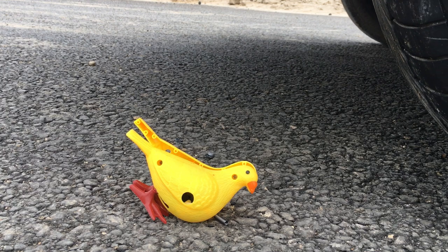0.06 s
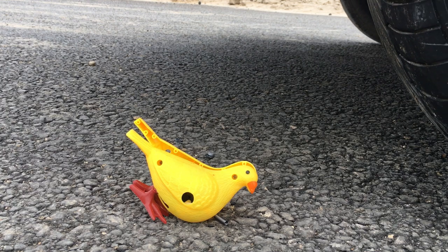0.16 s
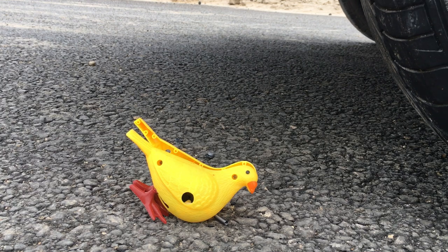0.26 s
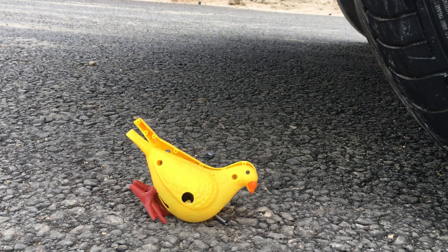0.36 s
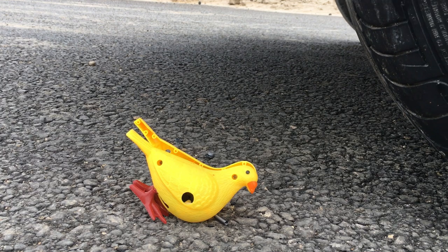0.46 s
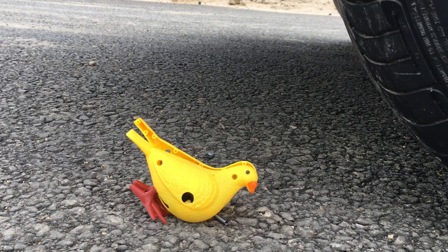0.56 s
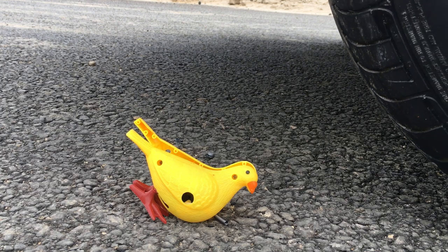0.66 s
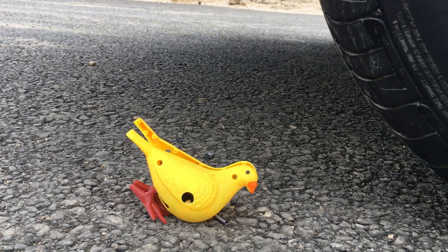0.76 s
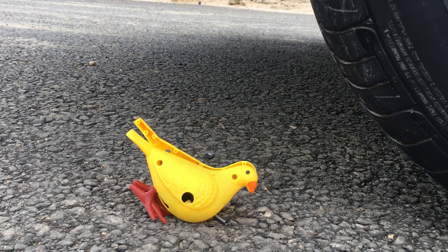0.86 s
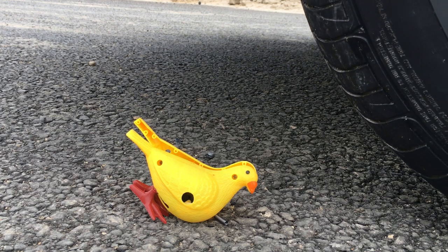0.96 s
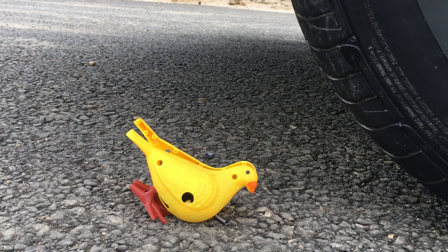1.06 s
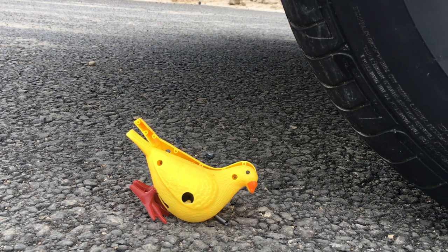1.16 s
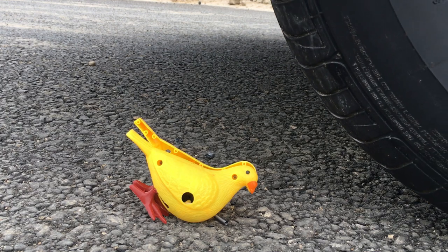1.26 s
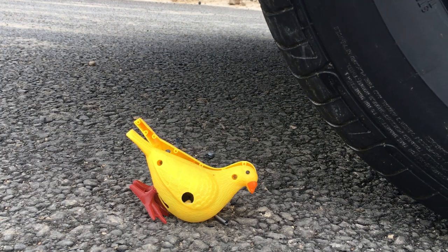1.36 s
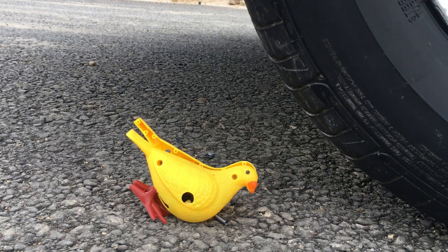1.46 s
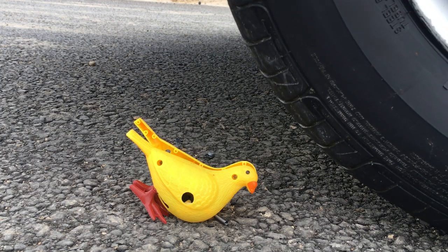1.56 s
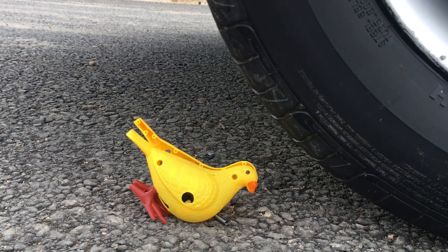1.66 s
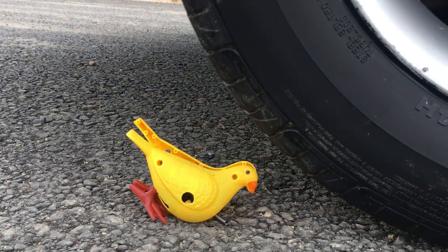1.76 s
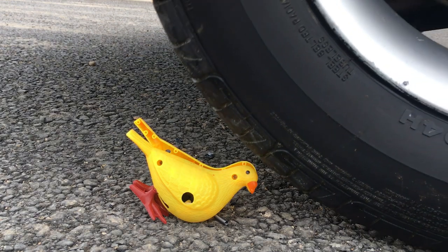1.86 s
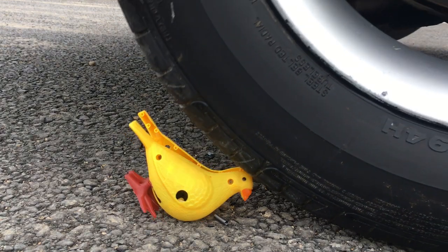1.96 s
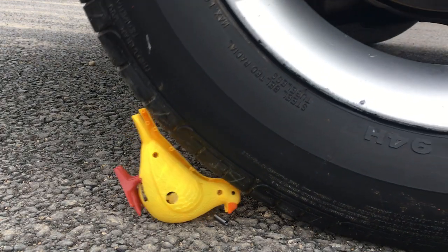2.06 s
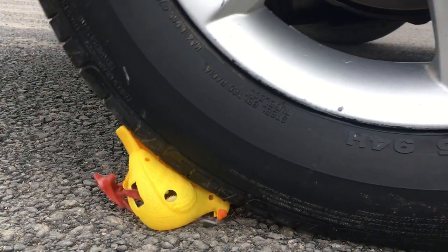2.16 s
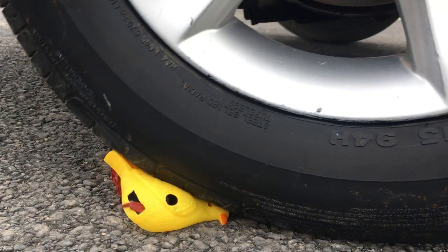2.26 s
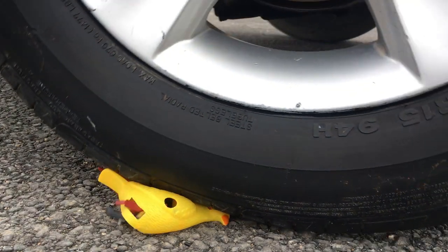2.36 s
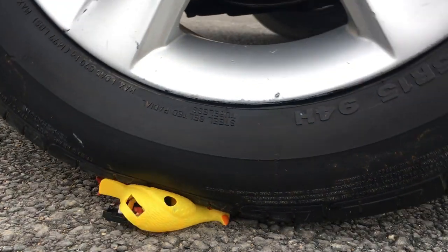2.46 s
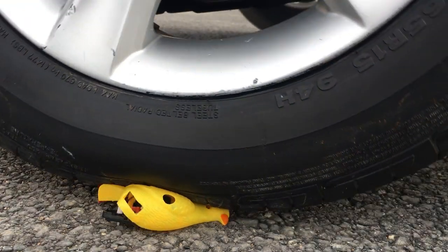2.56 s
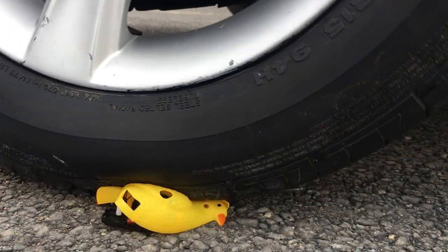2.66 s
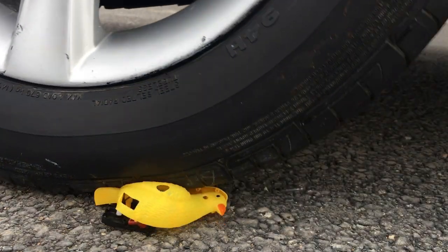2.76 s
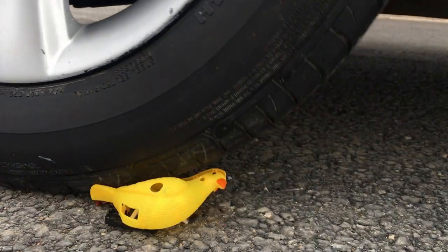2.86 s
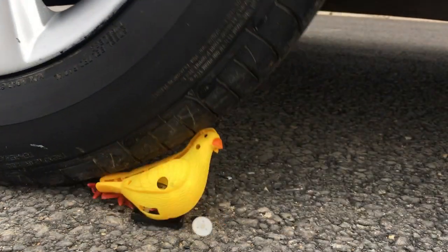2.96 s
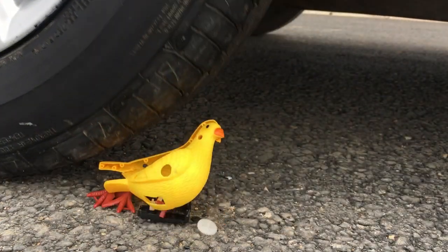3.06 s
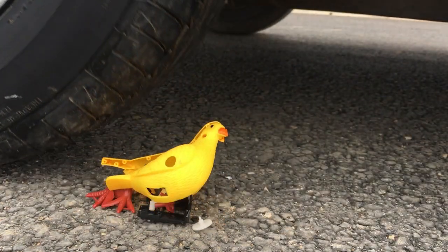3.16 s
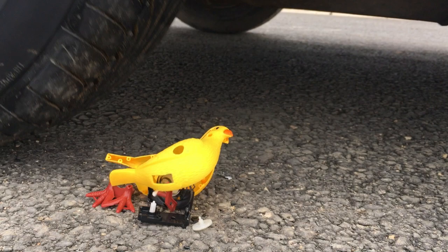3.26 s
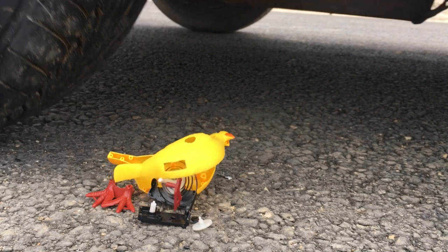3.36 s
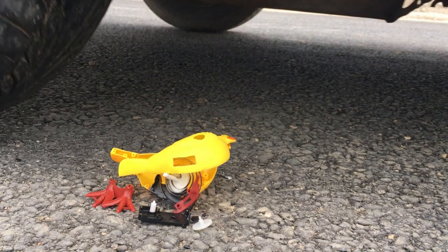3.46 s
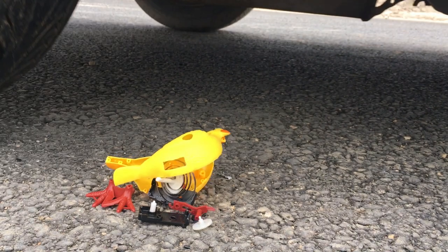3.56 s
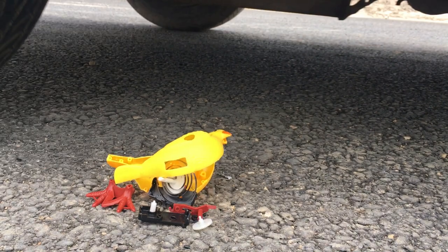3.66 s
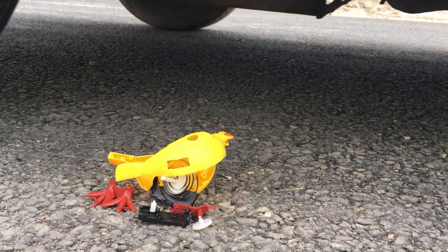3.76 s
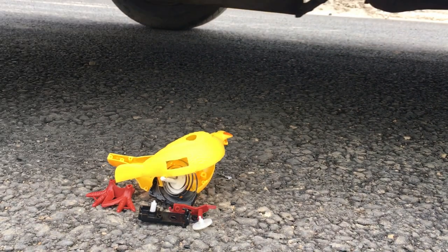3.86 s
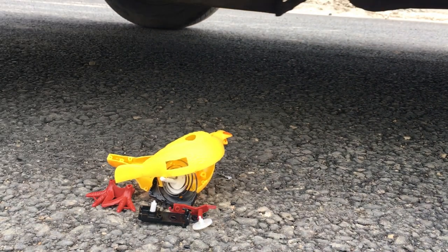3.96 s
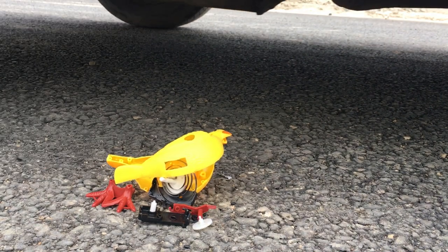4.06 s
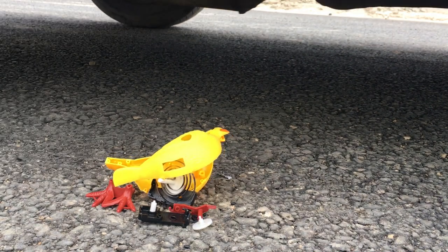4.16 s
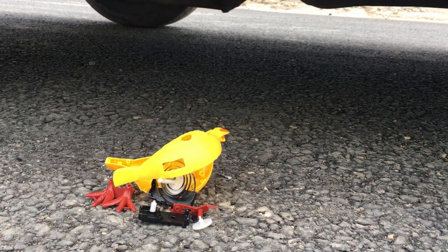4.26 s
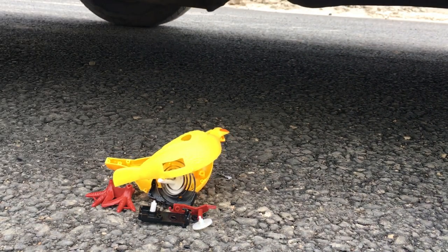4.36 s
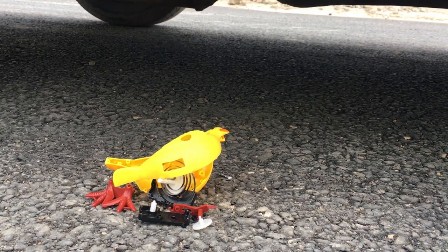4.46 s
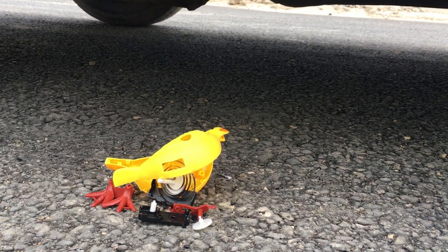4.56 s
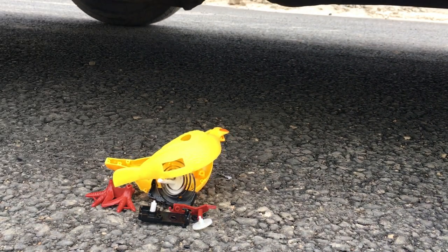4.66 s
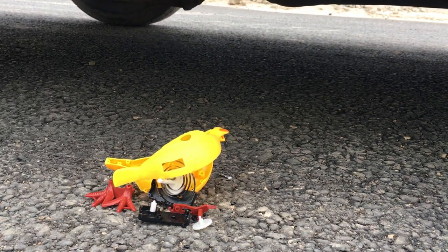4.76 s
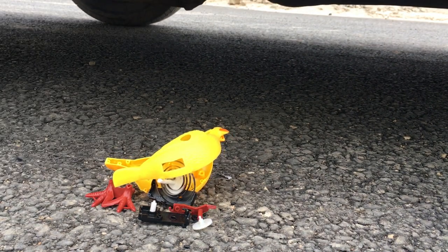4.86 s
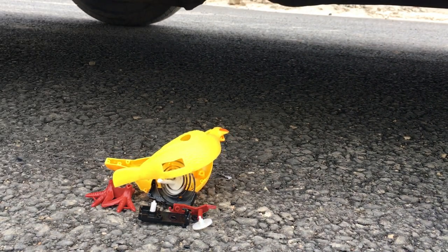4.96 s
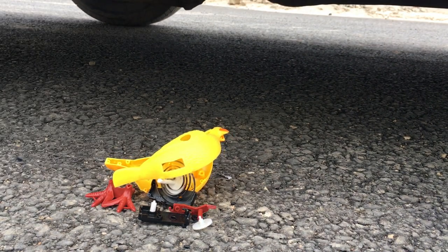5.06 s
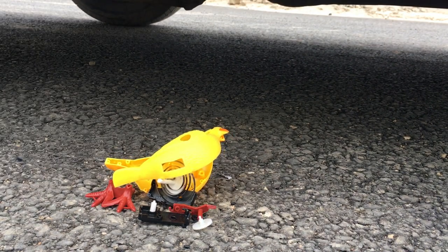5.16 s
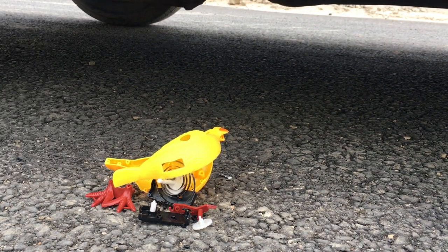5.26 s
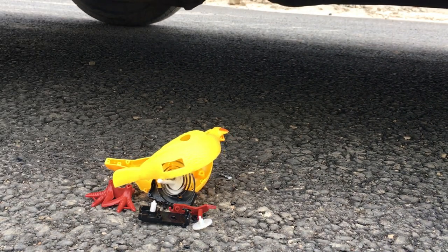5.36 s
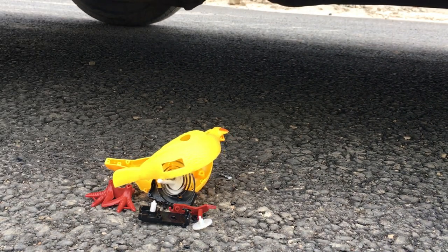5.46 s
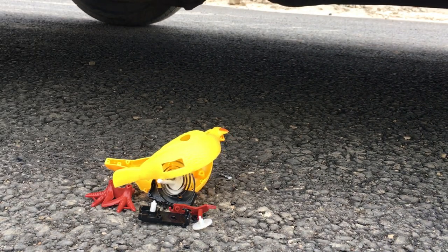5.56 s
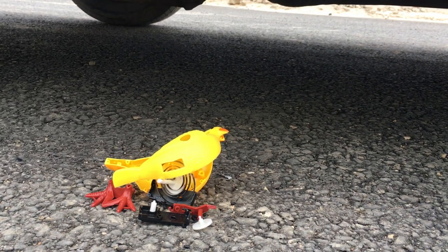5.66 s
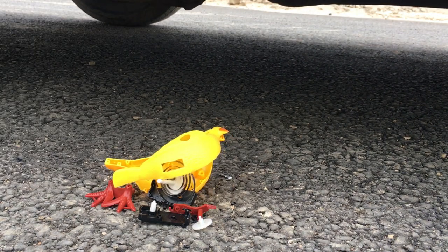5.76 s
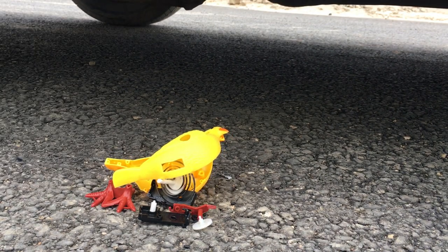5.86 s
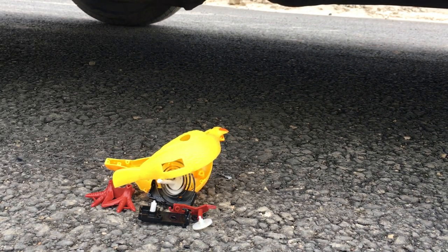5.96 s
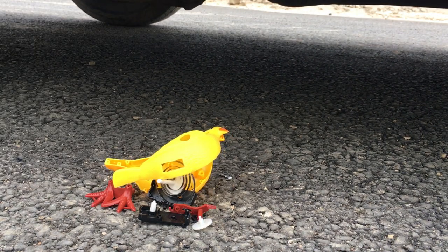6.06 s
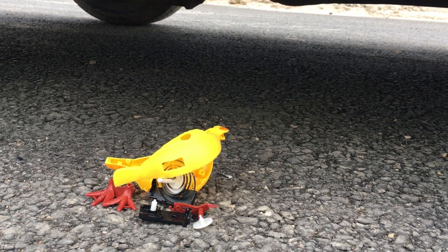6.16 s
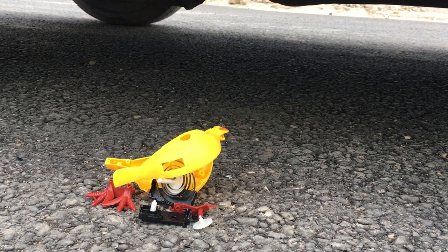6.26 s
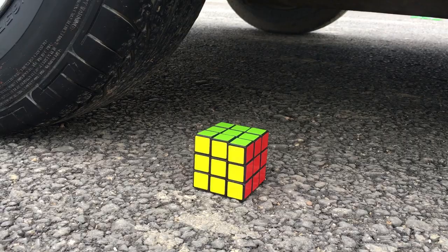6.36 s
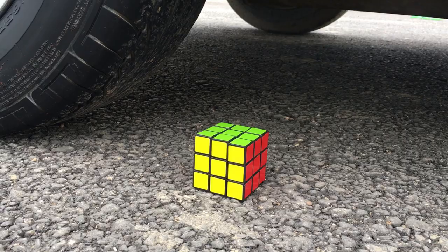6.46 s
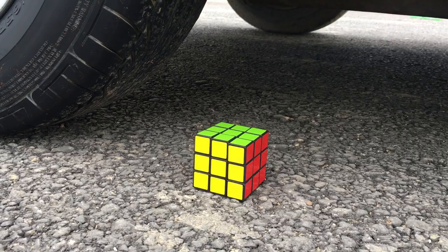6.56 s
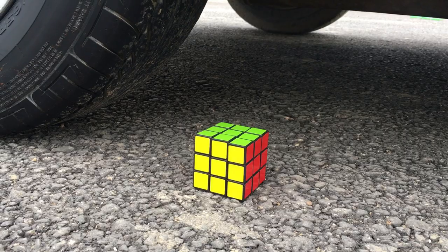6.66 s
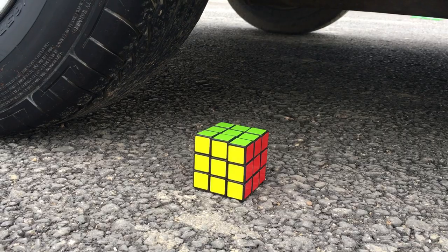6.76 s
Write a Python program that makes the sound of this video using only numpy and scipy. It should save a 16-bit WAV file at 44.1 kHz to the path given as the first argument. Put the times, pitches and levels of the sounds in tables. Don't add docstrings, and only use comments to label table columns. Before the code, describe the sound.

Low engine rumble close to the road, scattered stone pops, then sharp plastic crunching under a tyre, settling back to idle and a dull clunk.

```python
import sys
import numpy as np
from scipy import signal
from scipy.io import wavfile

SR = 44100
rng = np.random.default_rng(int(sys.argv[2]) if len(sys.argv) > 2 else 0)


def digitize_waveform(pressure):
    field = np.atleast_2d(pressure).T
    bounded = np.clip(field, -1, 1)
    quanta = np.round(bounded * 32767).astype(np.int16)
    wavfile.write(sys.argv[1], SR, quanta)


def convert_level_to_amplitude(level_db):
    exponent = np.asarray(level_db, float) / 20
    return 10 ** exponent


N = 300321
TIME_S = np.arange(N) / SR
SCENE_CHANGE_S = 6.339

# start_s, firing_rate_hz, exhaust_beat_db, load_db (re mean)
ENGINE = [(0.0, 38.09, -42.5, 11.5), (0.47, 30.34, -39.5, 2.5), (1.02, 28.14, -41.5, -2),
          (1.76, 25.66, -46.5, 7.5), (2.27, 26.46, -50, 13.5), (2.67, 28.95, -44, 1), (3.24, 34.99, -37, 0),
          (3.51, 36.29, -38.5, -2.5), (4.0, 33.2, -42, 2.5), (4.46, 30.08, -43.5, -2),
          (4.7, 28.47, -40.5, -4.5), (5.1, 27.09, -46.5, -2.5), (5.52, 25.22, -51, -2),
          (6.3, 26.09, -50, 1.5), (6.81, 25.82, -45, 8)]


def rms_one(x):
    return x / np.sqrt(np.mean(x ** 2) + 1e-20)


def peak_one(x):
    return x / (np.max(np.abs(x), axis=-1, keepdims=True) + 1e-20)


def in_time(rows):
    s, *columns = np.transpose(rows)
    return [np.interp(TIME_S, s, c) for c in columns]


def band(x, low_hz, high_hz):
    edges = [low_hz, min(high_hz, .45 * SR)]
    return signal.sosfilt(signal.butter(2, edges, "band", fs=SR, output="sos"), x)


def drift(rate):
    r = np.exp(-80 * np.pi * rate / SR)
    slow = signal.lfilter([1], [1, -2 * r, r * r], rng.standard_normal(N // 40 + 2002))[2000:]
    return np.interp(np.arange(N) / 40, np.arange(len(slow)), rms_one(slow))


def ring(clicks, hz, t60):
    r, w = convert_level_to_amplitude(-60 / (t60 * SR)), 2 * np.pi * hz / SR
    return signal.lfilter([0, np.sin(w)], [1, -2 * r * np.cos(w), r * r], clicks + 1e-18)


def click(s, db):
    x = np.zeros(N)
    x[round(s * SR)] = convert_level_to_amplitude(db)
    return x


def place(starts_s, shapes):
    length = len(shapes[0])
    out = np.zeros(N + length)
    for s, shape in zip(starts_s, shapes):
        i = round(float(s) * SR)
        out[i:i + length] += shape
    return out[:N]


def engine():
    # order_multiple, level_db (re the beat), load_share
    low_orders = [(1, -5, 0.99), (2, 0.5, .05), (3, -9.5, .3)]
    # order_multiple, level_db (re order 2 at full speed)
    upper_orders = [(4, -19), (5, -27.5), (6, -10)]
    rate_hz, beat_db, load_db = in_time(ENGINE)
    phase = 2 * np.pi * np.cumsum(rate_hz) / SR
    orders = [(k, beat_db + db + share * load_db) for k, db, share in low_orders]
    orders += [(k, beat_db + db + 1.2 * (rate_hz - 36)) for k, db in upper_orders]
    tones = np.zeros(N)
    for k, db in orders:
        gain, turn = convert_level_to_amplitude(1.5 * drift(4)), .25 * drift(3)
        tones += convert_level_to_amplitude(db) * gain * np.sin(round(k) * phase + turn)
    return np.sqrt(2) * tones, phase


def bay_levels():
    # level_db, load_share, gain_when_open_db, gain_as_tyre_passes_db
    layers = [(-37.5, 0.45, -0.47, 0.9), (-56.5, 0.17, 5, 8.5), (-60, 0.27, 6.5, -0.5),
              (-69.5, 0.075, 9.5, 0.96)]
    # rumble_db, boom_db, drone_db, hiss_db
    losses = (0.1, 4.9, 0.34, 1.9)
    # start_s, open_share (0-1)
    open_curve = [
        (0.0, 0.26),
        (1.0, 0),
        (1.9, 0.13),
        (3.2, 0.9),
        (5.2, 0.59),
        (6.2, 0.46),
        (6.34, 0.51),
        (6.81, 0.46),
    ]
    load_db, (opening,) = in_time(ENGINE)[-1], in_time(open_curve)
    nearest_s, pass_s = 1.7, 0.39
    tyre_near = 1 / (1 + ((TIME_S - nearest_s) / pass_s) ** 2)
    moved = TIME_S > SCENE_CHANGE_S
    return [db + share * load_db + open_db * opening + tyre_db * tyre_near - loss_db * moved
            for (db, share, open_db, tyre_db), loss_db in zip(layers, losses)]


def engine_bay(phase):
    # pitch_hz, density_db (per Hz)
    colour = [(31, -24.5), (52, -6), (80, -5.5), (107, -10.5), (129, -15), (214, -13.5), (259, -15),
              (380, -16), (726, -35.5), (901, -33.5), (1990, -40), (3620, -49.5), (16000, -74)]
    hz, colour_db = np.transpose(colour)
    groups = [0, 0, 0, 0]
    white = rng.standard_normal((2, N))
    edges_hz = 24 * 2 ** np.arange(0, 9.6, .5)
    for k, (low, high) in enumerate(zip(edges_hz, edges_hz[1:])):
        centre = np.sqrt(low * high)
        gain = convert_level_to_amplitude(np.interp(np.log(centre), np.log(hz), colour_db) + 0.73 * drift(15))
        group = int(centre > 200) + int(centre > 520) + int(centre > 1500)
        groups[group] = groups[group] + gain * band(white[k % 2], low, high)
    throb = convert_level_to_amplitude(0.76 * np.sin(phase))
    trims_db = (-4, 2.03, -0.47, -2.63)
    return throb * sum(convert_level_to_amplitude(db + trim) * rms_one(g) for db, trim, g in zip(bay_levels(), trims_db, groups))


def whine_and_panels(phase):
    # firing_rate_multiple, level_db
    belts = [(34.5, -63), (27.9, -61.5), (47.0, -66), (17.25, -64)]
    # low_hz, high_hz, gain_db
    windows = [(590, 660, 1.4), (860, 970, 4.5), (990, 1110, 3.5), (1160, 1270, 0)]
    # pitch_hz, width_hz, level_db
    panel_peaks = [(900, 62, -67), (1720, 170, -74), (2425, 230, -75.5), (3580, 430, -76.5),
                   (5560, 200, -89)]
    near = np.interp(TIME_S, [2.6, 3.7, 4.0, 5.1, 5.6], [.1, .8, 1, .9, .15])
    tones = sum(convert_level_to_amplitude(db + 1.6 * drift(3)) * np.sin(k * phase) for k, db in belts)
    tones = sum(convert_level_to_amplitude(db) * band(tones, low_hz, high_hz) for low_hz, high_hz, db in windows)
    white = rng.standard_normal(N)
    panels = sum(convert_level_to_amplitude(db) * rms_one(band(white, hz - w / 2, hz + w / 2)) for hz, w, db in panel_peaks)
    return near * tones + near ** 0.082 * panels


def hollow_under_car():
    # pitch_hz, width_hz, level_db
    hollow = (635, 110, -59.5)
    hz, w, db = hollow
    noise = rms_one(band(rng.standard_normal(N), hz - w / 2, hz + w / 2))
    return convert_level_to_amplitude(db + 2 * drift(18.0)) * noise * (TIME_S > SCENE_CHANGE_S)


def clunk():
    # pitch_hz, delay_s, t60_s, level_db
    modes = [(76.8, 0.021, 0.18, -22), (215, 0.004, 0.14, -30), (269, 0.0038, 0.16, -35.5),
             (430, 0.0076, 0.15, -37.5), (588, 0.0075, 0.2, -41.5)]
    start_s = 5.962
    t = TIME_S - start_s
    thud = sum(ring(click(start_s + lag, db), hz, t60) for hz, lag, t60, db in modes)
    late = np.maximum(t - .013, 0)
    first_touch = convert_level_to_amplitude(-26) * (t > 0) * (t < .013)
    shape = first_touch + np.minimum(late / .004, 1) * convert_level_to_amplitude(-60 * late / .1)
    noise = band(band(rng.standard_normal(N), 430, 5700), 200, 6200)
    rattle = signal.lfilter([1], [1, -.82], noise)
    return thud + convert_level_to_amplitude(-36.0) * shape * rms_one(rattle)


def tyre():
    # start_s, push_db, air_ring_db
    blows = [
        (0.366, -20.5, -46.5),
        (2.149, -15.5, -38),
        (2.284, -11, -40),
        (2.371, -10.5, -33.5),
        (2.51, -16.5, -43.5),
    ]
    # pitch_hz, t60_s, level_db
    carcass_modes = [(88.5, 0.13, -20), (115.14, 0.19, -14.5), (196, 0.053, -11.5), (263, 0.038, -1),
                     (382, 0.056, -10)]
    push = sum(click(s, db) for s, db, air_db in blows)
    air = sum(click(s, air_db) for s, db, air_db in blows)
    carcass = sum(convert_level_to_amplitude(db) * ring(push, hz, t60) for hz, t60, db in carcass_modes)
    return carcass + ring(air, hz=229.2, t60=2.17)


def cracks(rows, edge_hz, air_db):
    s, db, body_db, snap_db, edge_db = np.transpose(rows)[:, :, None]
    t60 = 0.015 * convert_level_to_amplitude(-0.19 * snap_db)
    t = np.arange(2000) / SR
    fall = t / np.clip(t60, .003, .05)
    size = (len(rows), 2000)
    uneven_db = 2.5 * (rng.exponential(1, size) - 2.0)
    fractures = rng.standard_normal(size) * convert_level_to_amplitude(uneven_db)
    first_snap = 6.97 * (t == 0)
    burst = (fractures + first_snap) * convert_level_to_amplitude(-60 * fall)
    longer, shorter = burst * convert_level_to_amplitude(25 * fall), burst * convert_level_to_amplitude(-20 * fall)

    def steep(x, low_hz, high_hz, cut_hz):
        return peak_one(band(band(x, low_hz, high_hz), low_hz / 2, cut_hz))

    shell = steep(burst, 1200, 3000, 3500)
    body = steep(longer, 520, 1200, 1700)
    snap = steep(band(burst, 2200, 9500), 3300, 7200, 8500)
    edge = steep(shorter, 7000, 1.2 * edge_hz, edge_hz)
    air = steep(shorter, 11500, 17000, 18000)
    bright = convert_level_to_amplitude(edge_db) * (edge - convert_level_to_amplitude(air_db) * air)
    shapes = convert_level_to_amplitude(db) * (shell - convert_level_to_amplitude(body_db) * body - convert_level_to_amplitude(snap_db) * snap + bright)
    return place(s[:, 0], shapes)


def faint_grit():
    # start_s, shell_peak_db, snap_db (re peak)
    grains = [(0.0131, -45, 1), (0.052, -49, -5), (0.0882, -51, -5), (0.1282, -49, -18), (0.1742, -47, -8),
              (0.2164, -44, -9), (0.2443, -44, -12), (0.2557, -57, 3), (0.2748, -41.5, -28),
              (0.3207, -44, -9), (0.3434, -46, -10), (0.4277, -50.5, -1), (1.2469, -62, 13),
              (1.2585, -60, 6), (1.4058, -51, 7), (1.4479, -52, 3.5), (1.514, -59, -5), (1.5211, -50.5, 3),
              (1.566, -52, -1.5), (1.72, -46.5, -4), (1.827, -48, -14), (1.8452, -48, -0.5),
              (1.866, -60, 9), (1.91, -65, 11), (1.9595, -56, 12)]
    rows = [(s, db, 3.5, snap_db, snap_db - 10.5) for s, db, snap_db in grains]
    return band(cracks(rows, edge_hz=9300, air_db=-41.0), 300, 10500)


def grit_pops():
    # start_s, shell_peak_db, then body_db, snap_db, edge_db re peak
    pops = [(0.1237, -35, -19, 0.5, -11), (0.2066, -31, -19, -17, -16), (0.2903, -19, -11, -15, -24),
            (0.2914, -20.5, -20, -7, -5.5), (0.2965, -46, 1, -20, -20), (0.365, -25, -19, 13.5, 4),
            (0.5226, -36, -1, -26, -9), (0.5628, -36.5, -24, -22, -11), (0.7467, -35, -36, -4.5, -32),
            (1.2706, -28.5, -21.5, 1.5, 9.5), (1.3892, -31.5, -13, 2.5, -16), (1.6223, -47, -26, 25.5, -36),
            (1.6411, -35, -22, 6, -34), (1.7639, -34, -31, -12, -21), (1.7841, -48, 6, 10, 2),
            (1.7916, -37.5, -5, -12, -8), (1.9417, -43, -5, -20, -21), (1.9726, -45, -8, -5, -21),
            (1.9823, -34.5, -12, -4, -27)]
    return cracks(pops, edge_hz=9300, air_db=-12)


def rings():
    # start_s, low_hz, high_hz, low_db, high_db
    pairs = [(0.2942, 760, 2230, -30, -30.5), (0.3639, 1820, 2730, -33, -9.5),
             (0.5222, 430, 1920, -32.5, -26), (1.389, 996, 3050, -16, -25),
             (1.6222, 2452, 3470, -23.5, -49), (2.045, 1320, 1660, -25.5, -18.5),
             (2.115, 1087, 1760, -29, -20), (2.151, 920, 2300, -30, -11.5),
             (2.194, 1322, 2008, -16.5, -17.5), (2.208, 901.5, 1699, -20.5, -26),
             (2.2642, 1765, 2185, -8.5, -20.5), (2.284, 1215, 520, -11, -17),
             (2.309, 961, 2450, -29, -25.5), (2.3493, 660, 1272, -18, -26), (2.369, 1208, 2440, -23, -24),
             (2.3713, 591, 410, -11, -35), (2.5098, 588, 900, -41, -22)]
    t = np.arange(3000) / SR
    starts, shapes = [], []
    for s, low_hz, high_hz, low_db, high_db in pairs:
        for hz, db in ((low_hz, low_db), (high_hz, high_db)):
            t60 = .011 * (1000 / hz) ** .6
            starts.append(s)
            shapes.append(convert_level_to_amplitude(db - 60 * t / t60) * np.sin(2 * np.pi * hz * t))
    return place(starts, shapes)


def pings():
    # start_s, pitch_hz, t60_s, level_db
    pieces = [(0.2914, 1070, 0.0096, -11), (0.2915, 4380, 0.0052, -10), (0.2916, 6200, .005, -17.5),
              (0.2915, 9100, 0.0034, -17.5), (0.2925, 2550, 0.0064, -5), (0.2987, 870, 0.013, -19),
              (0.5629, 2950, 0.0042, -30.5), (0.7465, 1830, 0.0065, -29), (0.7466, 4430, 0.0044, -36),
              (1.27069, 2500, 0.0022, -13), (1.27068, 4000, 0.002, -9), (1.271, 940, 0.011, -20),
              (2.149, 133, 0.06, -11.5), (2.1492, 1620, 0.021, -13.5), (2.1949, 1600, 0.0061, -11.5),
              (2.2473, 1780, 0.0093, -11), (2.5285, 6040, .005, -43), (2.2635, 1780, 0.012, -5),
              (2.2813, 5720, 0.003, 0), (2.283, 6000, 0.0051, -11), (2.306, 900, 0.013, -22),
              (2.35, 5070, 0.0064, -16), (2.3495, 8700, 0.0045, -14), (2.426, 4280, .006, -27.5),
              (2.425, 1770, 0.0095, -24), (2.617, 1590, 0.0046, -14.5), (2.618, 1120, .009, -10.5),
              (2.61805, 2800, 0.0045, -9), (2.641, 940, 0.0081, -24), (2.651, 4240, 0.0049, -28.5),
              (2.652, 646, 0.011, -32), (2.666, 1140, .02, -29), (2.7342, 1800, 0.0093, -28),
              (2.734, 5260, 0.0061, -30), (2.739, 2000, 0.007, -42), (2.744, 1910, 0.0056, -28),
              (2.745, 4400, .005, -40), (2.7673, 1770, 0.0072, -22), (2.7672, 7140, 0.004, -25),
              (2.804, 6000, .008, -46), (2.8085, 9200, 0.0064, -46), (2.815, 2740, 0.0041, -26),
              (2.851, 2170, 0.0055, -29.5), (2.8744, 1690, .008, -26), (2.9045, 2200, 0.0058, -36),
              (2.94, 1500, 0.0064, -36), (2.9595, 1816, .008, -36), (2.979, 2000, 0.007, -38),
              (2.996, 3500, 0.0063, -40), (3.005, 2000, 0.0073, -39)]
    # start_s, pitch_hz, t60_s, level_db
    more_pieces = [
        (0.2945, 606, 0.045, -19),
        (0.284, 3050, 0.02, -36),
        (0.2066, 2000, 0.008, -30),
        (0.305, 2350, 0.04, -38),
        (2.284, 224, 0.05, -16),
        (2.372, 257, 0.05, -16),
        (2.1495, 615, 0.02, -20),
        (2.282, 1215, 0.016, -13),
        (2.371, 1210, 0.02, -17),
        (2.415, 6200, 0.008, -40),
    ]
    # start_s, level_db
    knocks = [
        (0.013, -40),
        (0.052, -45),
        (0.09, -39.5),
        (0.129, -38.5),
        (0.175, -38),
        (0.206, -45),
        (0.217, -40),
        (0.244, -37.5),
        (0.2557, -46),
        (0.275, -42),
    ]
    # pitch_hz, delay_s, t60_s, level_db (re the knock)
    knock_modes = [(900, 0.003, 0.0226, 3), (1030, 0.002, 0.021, -2), (3900, 0.0001, 0.006, -5)]
    knock_rings = [(s + lag, hz, t60, db + rel_db) for s, db in knocks for hz, lag, t60, rel_db in knock_modes]
    t = np.arange(3000) / SR
    sources = pieces + more_pieces + knock_rings
    shapes = [-convert_level_to_amplitude(db - 60 * t / max(t60, .001)) * np.sin(2 * np.pi * hz * t) for s, hz, t60, db in sources]
    return place([row[0] for row in sources], shapes)


def whips():
    # start_s, first_pitch_hz, pitch_fall_s, t60_s, level_db
    sweeps = [
        (0.365, 3040, 0.00061, 0.0073, -0.5),
        (1.2705, 6800, 0.002, 0.0014, 8),
        (0.5224, 2600, .0012, .006, -16),
        (0.7463, 2500, .0012, .007, -17),
        (0.5626, 3000, .0012, .005, -24),
        (2.7335, 2400, .0012, .006, -20),
        (2.7669, 2400, .0012, .006, -14),
        (2.2812, 1610, 0.0011, 0.0062, 2),
        (2.3671, 2780, 0.0011, 0.0045, 6),
        (2.5072, 1520, 0.0011, 0.0099, 1),
    ]
    t = np.arange(3000) / SR
    shapes = []
    for s, hz, fall_s, t60, db in sweeps:
        swell = (1 - np.exp(-1.2 * hz * t)) * convert_level_to_amplitude(db - 60 * t / t60)
        cycles = hz * (fall_s * (1 - np.exp(-t / fall_s)) + .12 * t)
        shapes.append(-swell * np.sin(2 * np.pi * cycles))
    return place([row[0] for row in sweeps], shapes)


def grind():
    # start_s, hold_s, level_db, then top_db, body_db re level
    slides = [(1.945, 0.03, -58, -21, -19), (1.979, 0.012, -53.5, -14, -18), (2.016, 0.004, -57, -10, -17),
              (2.046, 0.008, -42.5, -24, -8), (2.063, 0.022, -46.5, -25, -5), (2.107, 0.003, -58, -19, -5),
              (2.115, 0.006, -49, -20, -1), (2.125, 0.003, -54, -22, -5), (2.209, 0.008, -40.5, -10, -15),
              (2.346, 0.008, -48, -7, -8.5), (2.478, 0.007, -58, -10, -13), (2.157, 0.029, -37, -13, -1),
              (2.18, 0.023, -45, -22.5, 4), (2.244, 0.043, -35.5, -16, -20), (2.31, 0.013, -35, -10.5, -6),
              (2.359, 0.005, -34.5, -1, -10.5), (2.872, 0.019, -42, -4, -25),
              (2.912, 0.017, -41.5, -9, -19), (2.936, 0.024, -46.5, -8.5, -13),
              (2.969, 0.032, -50, -7, -18), (3.003, 0.013, -51.5, -3, -18), (3.02, 0.008, -62, -8, -18)]
    s, hold, db, top_db, body_db = np.transpose(slides)[:, :, None]
    rise_db = 2500 * np.maximum(s - TIME_S, 0)
    fall_db = 804.5 * np.maximum(TIME_S - s - hold, 0)
    level = convert_level_to_amplitude(db - rise_db - fall_db)
    born = rng.random(N) < 3600 * convert_level_to_amplitude(4 * drift(90)) / SR
    strength = convert_level_to_amplitude(3.0 * np.minimum(rng.exponential(1, N), 4))
    slips = born * strength * rng.choice([-1, 1], N)
    pitches_hz, dealt = np.geomspace(1100, 4500, 12), rng.integers(0, 12, N)
    shell = sum(ring(slips * (dealt == k), hz, 28 / hz) for k, hz in enumerate(pitches_hz))
    top = signal.lfilter([1], [1, -.6], band(band(slips, 4200, 10000), 2500, 9500))
    air = -band(band(slips, 9800, 17000), 6000, 17000)
    body = band(slips, 240, 1200)
    layers = (0, shell), (top_db, top), (top_db - 15, air), (body_db, body)
    return sum(np.sum(level * convert_level_to_amplitude(share_db), axis=0) * rms_one(x) for share_db, x in layers)


def toy_breaks():
    # start_s, shell_peak_db, then body_db, snap_db re peak
    breaks = [(2.0466, -37, -5, -2), (2.0496, -27.5, -24, -6), (2.075, -28.5, -3, -6), (2.115, -35, 6, -9),
              (2.1484, -10.5, -3.5, -8), (2.153, -14, -24, -6), (2.1905, -23, -2.5, 7),
              (2.1926, -19.5, -2.5, -10), (2.209, -18, -20.5, -24), (2.217, -19, -30, -14),
              (2.2436, -22, -14, -8), (2.2472, -21, -15, -8.5), (2.2622, -11.5, -28, -6),
              (2.2724, -27, -11, -3), (2.2808, -15, -11, 9), (2.308, -15, -13, -9), (2.349, -13.5, -3, 0),
              (2.368, -18, -24, 0.5), (2.376, -29, 3.5, 8), (2.3932, -29.5, -3, -11),
              (2.425, -25.5, -11, -3.5), (2.5074, -38.5, 5, 22.5), (2.618, -19.5, -22, -3),
              (2.651, -32, 0, -17), (2.7343, -27, -38, -8), (2.7669, -19.5, -30, -15),
              (2.8142, -33, -2, -5.5), (2.8755, -27, -13, -5), (2.912, -29, -2, -14),
              (2.92, -24, -9.5, -16)]
    # start_s, shell_peak_db, snap_db (re peak)
    splinters = [(2.0195, -44, -3), (2.0656, -36, -8), (2.0899, -51, -9), (2.098, -39, -9),
                 (2.143, -37, -1), (2.176, -32, -23), (2.1806, -21, -11), (2.2233, -30, -3),
                 (2.2287, -27, -18), (2.2387, -32, -18), (2.319, -34, 7), (2.3243, -28, -7),
                 (2.36, -42, 24), (2.4024, -43, 12), (2.415, -60, -4), (2.482, -39, -7), (2.4856, -58, 8),
                 (2.5185, -36.5, 14.5), (2.641, -29.5, -14), (2.6627, -37, -19), (2.6852, -45, -6),
                 (2.745, -38, -1), (2.7854, -42, 1), (2.8085, -42, -4), (2.851, -34, -14),
                 (2.869, -37, -11), (2.903, -37, -16), (2.925, -31, -6), (2.9583, -34, -15),
                 (2.979, -40, -8)]
    rows = breaks + [(s, db, -14, snap_db) for s, db, snap_db in splinters]
    plastic = [(*row, -4.5 + 0.9 * row[-1]) for row in rows]
    return cracks(plastic, edge_hz=10000, air_db=-7.5)


def floor_pan(x):
    t = np.arange(round(.056 * SR)) / SR
    noise = rng.standard_normal((2, len(t))) * (t > .002)
    quick = signal.lfilter([.35], [1, -.65], noise[0] * convert_level_to_amplitude(-60 * t / 0.061))
    shelf = signal.lfilter([.9], [1, -.05], noise[1] * convert_level_to_amplitude(-29 - 60 * t / 0.23))
    tail = quick + shelf
    return convert_level_to_amplitude(-18) * signal.fftconvolve(x, tail / np.sqrt(np.sum(tail ** 2)))[:N]


def scene():
    orders, phase = engine()
    car = orders + engine_bay(phase) + whine_and_panels(phase) + hollow_under_car() + tyre() + clunk()
    pieces = band(rings() + pings() + whips(), 110, 9500)
    hits = faint_grit() + grit_pops() + toy_breaks() + pieces
    return (car + hits + floor_pan(hits) + grind())[None]


def top_cut(x):
    return signal.sosfilt(signal.butter(12, 16660, fs=SR, output="sos"), x)


def record(dry):
    since = TIME_S - SCENE_CHANGE_S
    fade = np.where(since < 0, np.clip(-since / 0.00062, .02, 1), np.clip(since / 0.027, .02, 1))
    heard = (dry + convert_level_to_amplitude(-80.5) * rng.standard_normal(N)) * fade
    tick = signal.lfilter([1], [1, -.7], click(SCENE_CHANGE_S, -39))
    limited = np.clip(heard + tick, -.9, .9)
    mix = signal.sosfilt(signal.cheby2(12, 60, 16660, fs=SR, output="sos"), limited)
    return top_cut(mix)


dry = scene()
out = record(dry)
digitize_waveform(out)
```